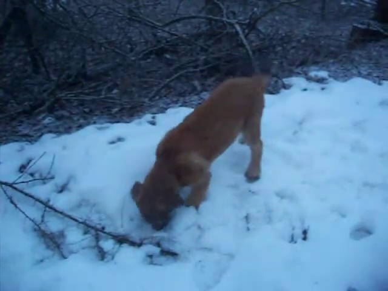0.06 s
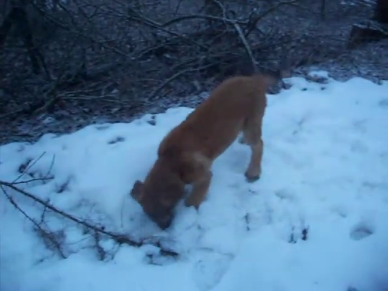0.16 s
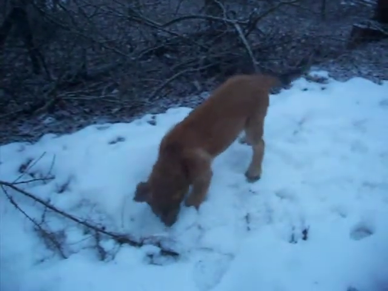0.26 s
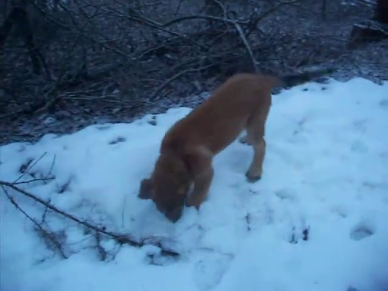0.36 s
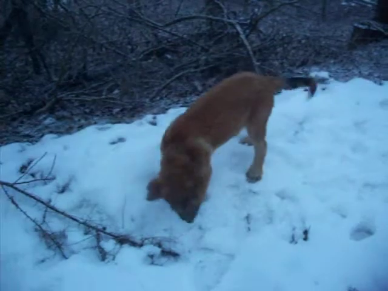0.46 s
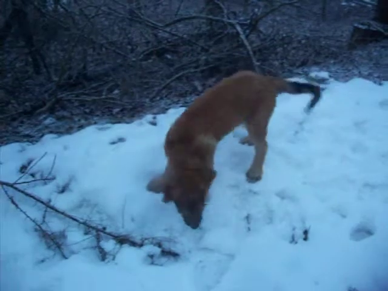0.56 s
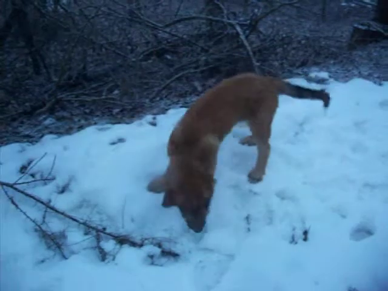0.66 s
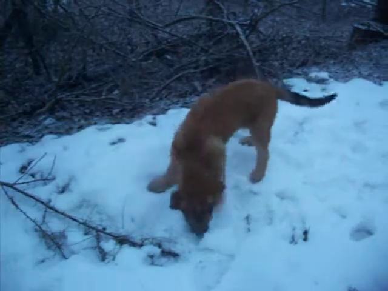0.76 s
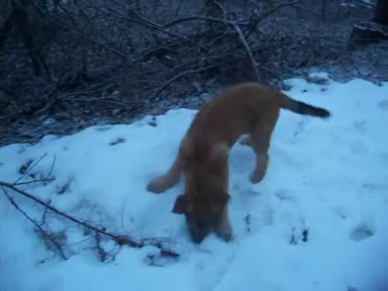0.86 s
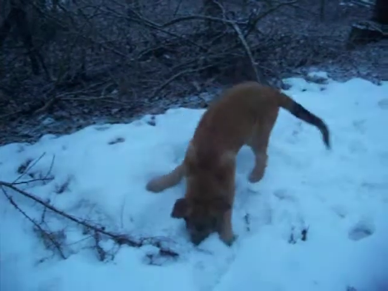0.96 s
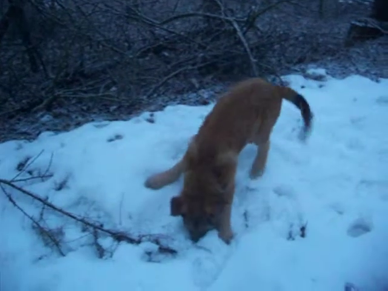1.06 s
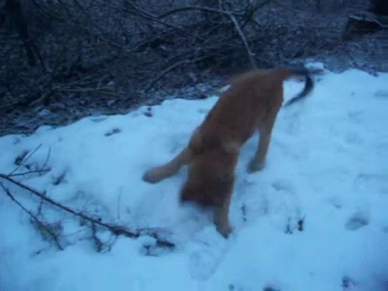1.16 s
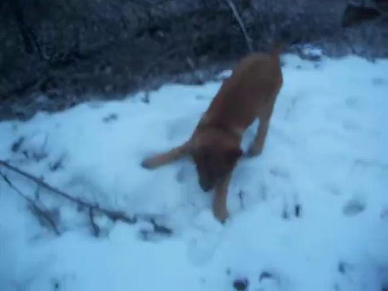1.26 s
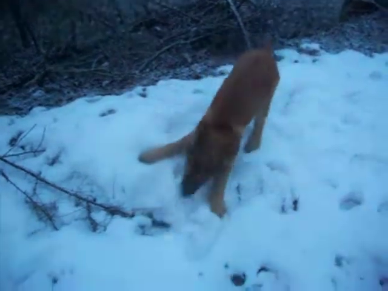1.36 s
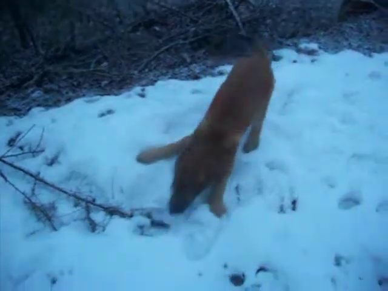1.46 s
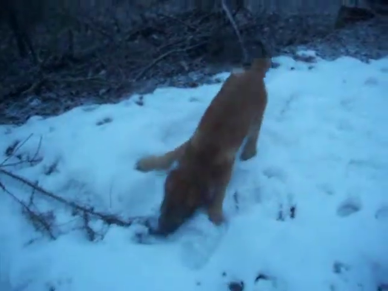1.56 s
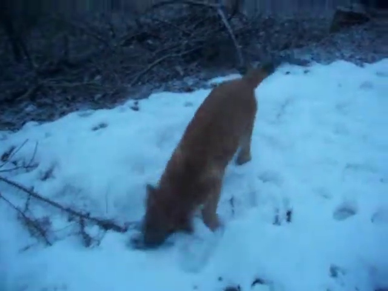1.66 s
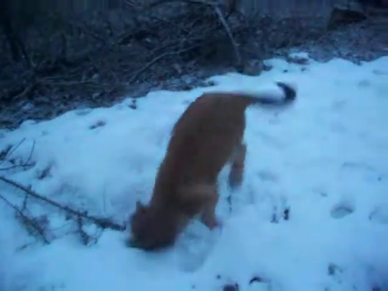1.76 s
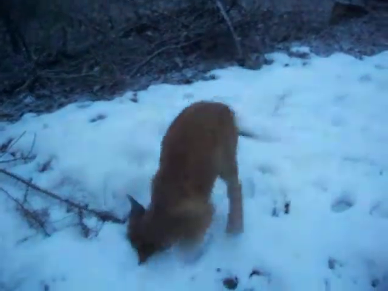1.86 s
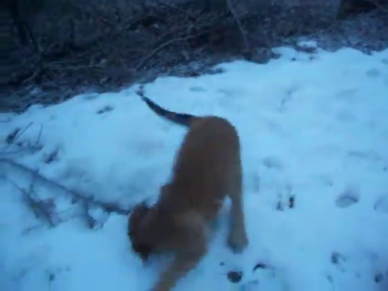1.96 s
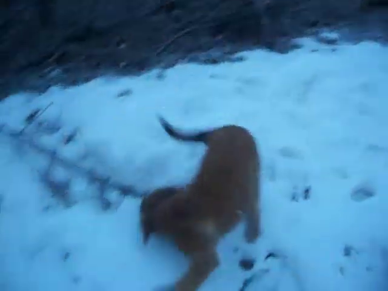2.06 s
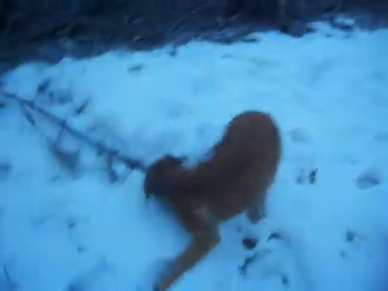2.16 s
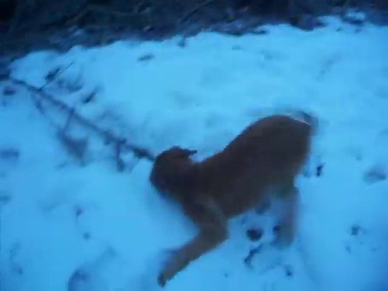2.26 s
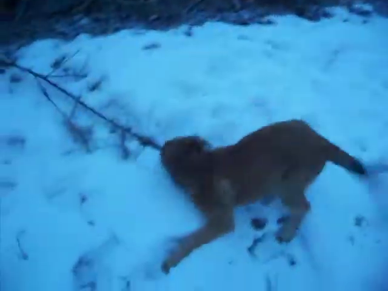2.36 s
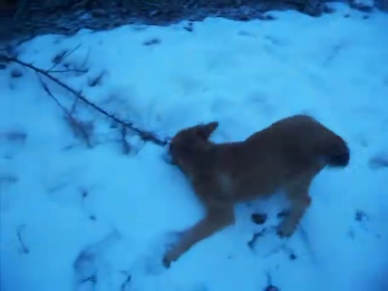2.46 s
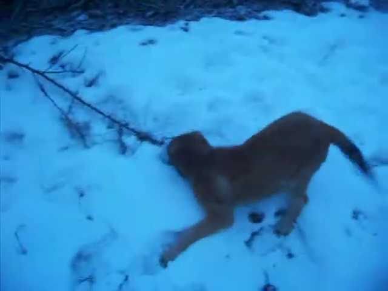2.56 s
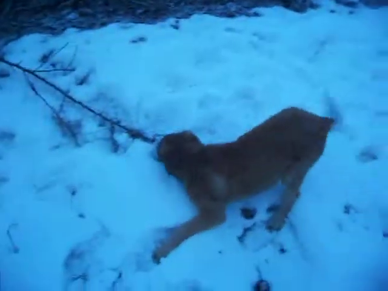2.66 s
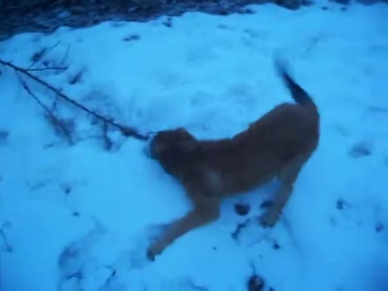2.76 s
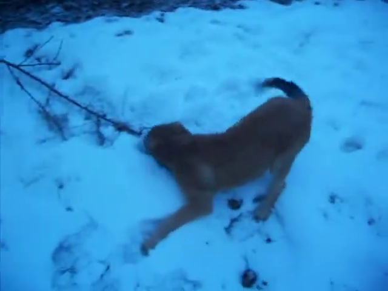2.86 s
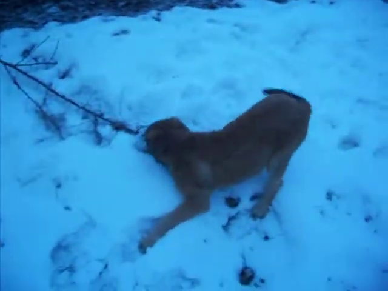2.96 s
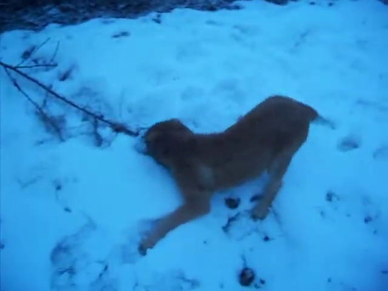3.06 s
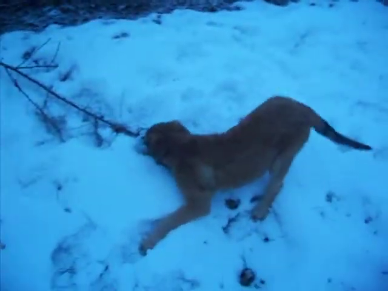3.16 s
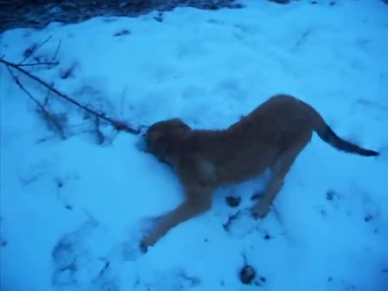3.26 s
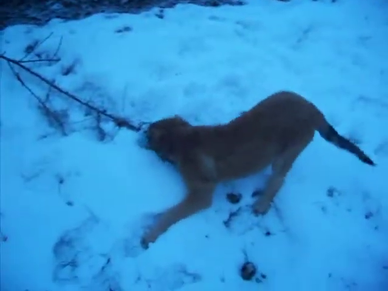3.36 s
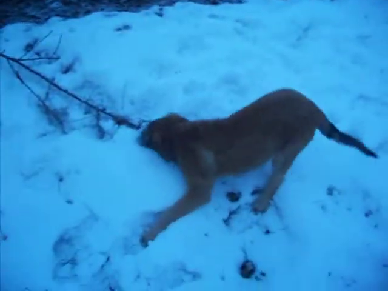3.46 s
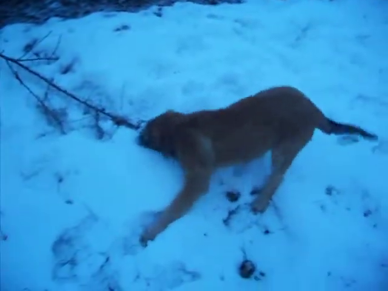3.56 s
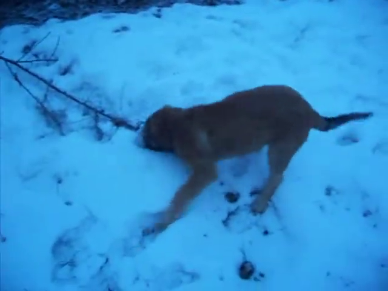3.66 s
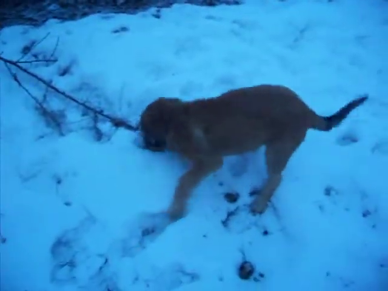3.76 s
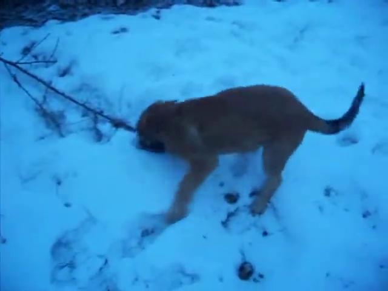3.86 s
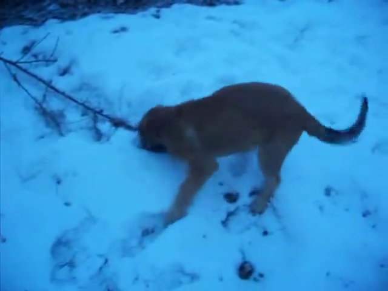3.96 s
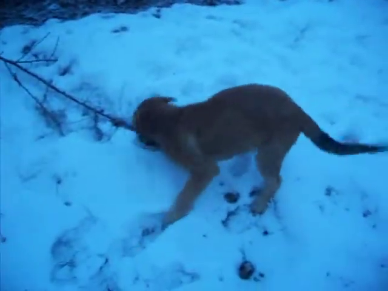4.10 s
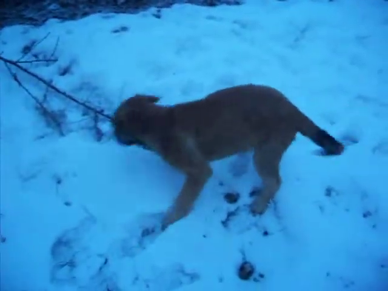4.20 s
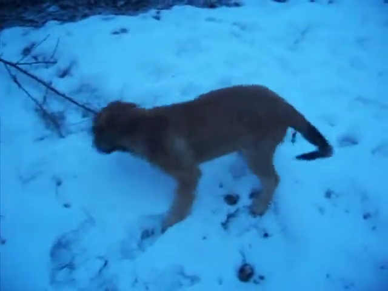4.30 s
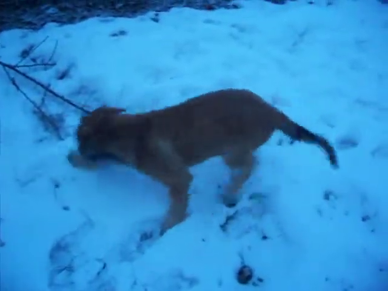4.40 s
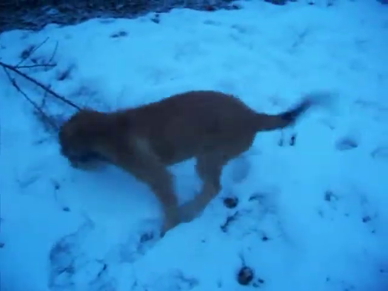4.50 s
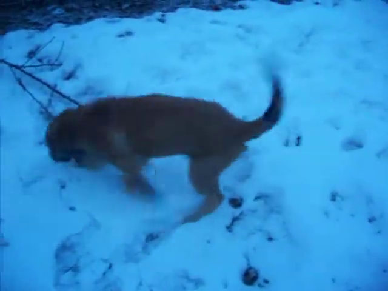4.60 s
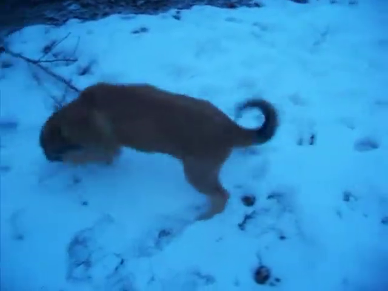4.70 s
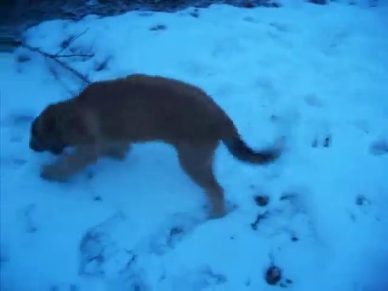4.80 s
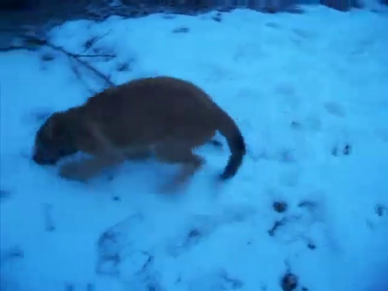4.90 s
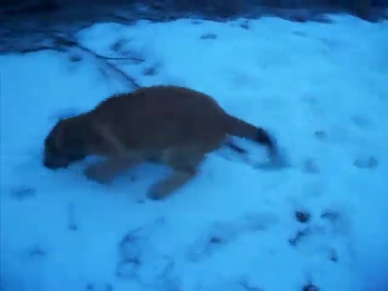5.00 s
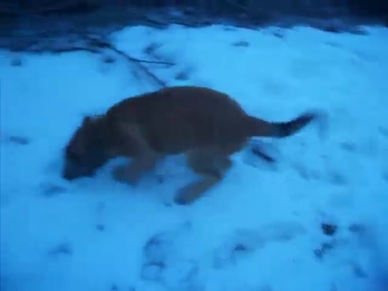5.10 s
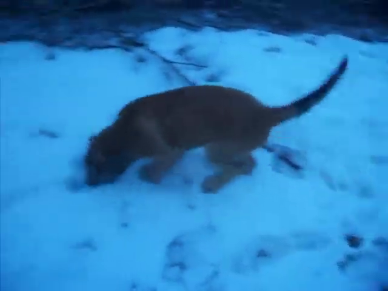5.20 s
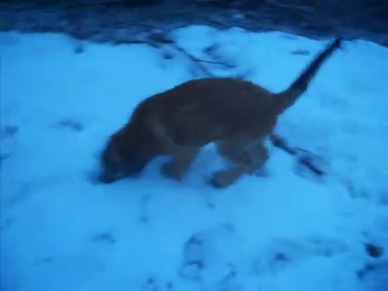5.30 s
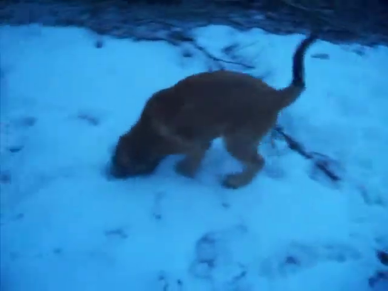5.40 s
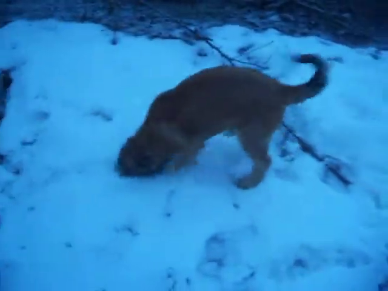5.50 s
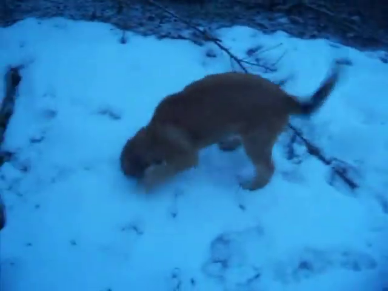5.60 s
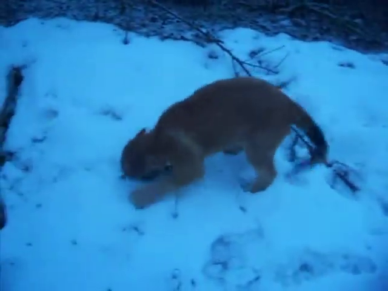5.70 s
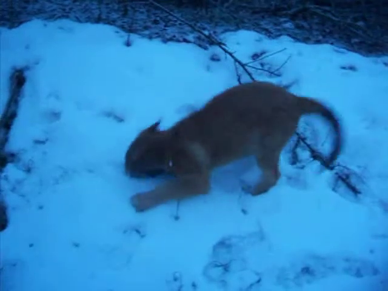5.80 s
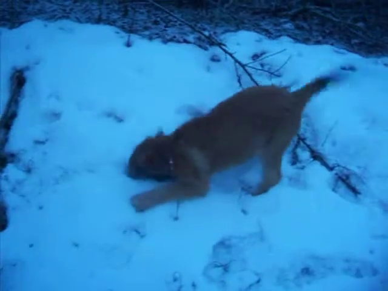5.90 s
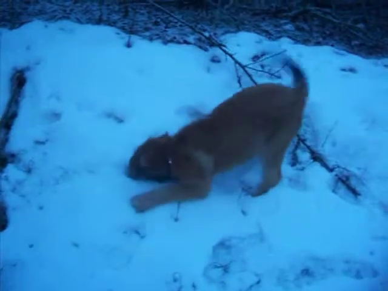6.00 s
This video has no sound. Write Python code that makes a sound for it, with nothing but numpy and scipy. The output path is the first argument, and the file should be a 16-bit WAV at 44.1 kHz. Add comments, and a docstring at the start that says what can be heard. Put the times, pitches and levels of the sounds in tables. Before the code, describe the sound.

Outdoors on crusty snow, a puppy roots close to a small camera. A steady, deep roar of far traffic with faint wavering engine hums lies underneath throughout, plus a barely audible thin whine. From 0 to 0.3 seconds a breathy snort fades away, with a soft low thump. A snap comes at 0.4, then from 0.5 to 1.0 strong grainy crunches burst out, made of tiny crackling crystals and hiss. Lighter scuffs continue to 1.7, then harder crunching returns around 1.9 to 2.4 with sharp snaps. From 2.5 to 3.5 it is nearly quiet, with only small ticks. Light scrapes resume at 3.6, a clear snap hits at 4.2, and from 4.4 crunching becomes dense and jerky. A short, gliding sniff comes at 5.1, more scuffs follow, and a dull paw thump lands at 5.85 before the crunching dies down. Mono, with softened highest treble.

```python
"""A puppy roots through crusty snow near a small camera, outdoors.
Nose and paws crush crystals in dense scuffs, made of thousands of tiny ringing clicks over soft hiss.
Short noise bursts make the snaps and the dull paw thumps; shaped noise makes one snort and one sniff.
Behind them, far traffic is a low noise roar with four wavering hums, two of them very faint.
The camera adds a faint steady whine."""
import sys
import numpy as np
from scipy import signal
from scipy.fft import rfft, irfft
from scipy.io import wavfile
from scipy.ndimage import uniform_filter1d

SR = 44100
rng = np.random.default_rng(int(sys.argv[2]) if len(sys.argv) > 2 else 0)


def file_out(sig):
    """Save sig as 16-bit WAV at sys.argv[1]."""
    # one column per channel
    cols = np.atleast_2d(sig).T
    # limit, then scale
    lim = np.clip(cols, -1, 1)
    pcm = np.round(lim * 32767).astype(np.int16)
    wavfile.write(sys.argv[1], SR, pcm)


N = 266668  # length in samples, about 6 seconds


def gain_of(db):
    """Turns decibels into amplitude."""
    return 10 ** (np.asarray(db) / 20)


def evened(x):
    """Scales a signal to an rms of 1."""
    return x / np.sqrt(np.mean(x ** 2) + 1e-20)


def read(points, hz):
    """Reads a spectrum table at the frequencies hz, along a logarithmic pitch scale."""
    f, value = np.transpose(points)
    return np.interp(np.log(hz + 1), np.log(f + 1), value)


def follow(rows, t):
    """Reads each column of a time curve at the times t."""
    s, *columns = np.transpose(rows)
    return [np.interp(t, s, c) for c in columns]


def add(mix, s, sound):
    """Mixes a sound in at s seconds."""
    part = mix[round(s * SR):][:len(sound)]
    part += sound[:len(part)]


def coloured(x, colour_db, size):
    """Reshapes the spectrum of x, one short moment after another, by colour_db(hz, t)."""
    overlap = size * 3 // 4
    hz, t, z = signal.stft(x, SR, nperseg=size, noverlap=overlap)
    z = z * gain_of(colour_db(hz[:, None], t))
    return signal.istft(z, SR, nperseg=size, noverlap=overlap)[1][:len(x)]


def patches(hz, t, size):
    """Random blobs over time and frequency, rms 1; size is (moments, frequency steps)."""
    field = rng.standard_normal((len(t), len(hz)))
    smooth_in_time = uniform_filter1d(field, size[0], 0)
    return evened(uniform_filter1d(smooth_in_time, size[1], 1)).T


# Nose and paws pushing through the crust.
# Each row: start in seconds, swell in seconds, hold in seconds, level at the top of the swell in dB,
# packed-snow body boost in dB, fine-powder fizz boost in dB (both boosts before the treble is levelled).
PUSHES = [(0.524, 0.028, 0.28, -45, -2, 0.0), (0.651, 0.034, 0.0032, -25.5, -2, 0.5),
          (0.694, 0.023, 0.01, -29, -0.5, -4), (0.728, 0.054, 0.029, -30, 2, -1.0),
          (0.808, 0.014, 0.24, -36.0, 2, -1), (0.872, 0.022, 0.044, -20.5, -1.5, -2),
          (0.914, 0.041, 0.1, -28.0, 2, 0), (0.951, 0.0034, 0.004, -20, -4.0, 3.0),
          (1.028, 0.16, 0.004, -43, 0.0, 0.0), (1.077, 0.016, 0.015, -42.0, -5, -1),
          (1.108, 0.022, 0.004, -40, -7.0, -2), (1.141, 0.018, 0.06, -36.5, 7, -0.5),
          (1.184, 0.077, 0.15, -40.5, 4, -4), (1.289, 0.034, 0.048, -36, 6.5, 2.5),
          (1.405, 0.009, 0.243, -51.0, 2, 0), (1.433, 0.149, 0.228, -47, 4, -3),
          (1.462, 0.012, 0.006, -37, -5, -4), (1.523, 0.003, 0.01, -37.5, 6, 0.0),
          (1.564, 0.029, 0.041, -35.5, 3, -2.5), (1.716, 0.041, 0.062, -31, 2.5, -2),
          (1.821, 0.01, 0.015, -34, 5, 3), (1.834, 0.048, 0.031, -30.0, 0, 0.5),
          (1.907, 0.11, 0.21, -34, 6, 1.5), (1.949, 0.13, 0.025, -22, 0.5, 2),
          (2.103, 0.0033, 0.037, -30.0, 3, -1.5), (2.178, 0.035, 0.24, -36, 2, -1.5),
          (2.285, 0.013, 0.051, -34, 3.0, -3), (2.313, 0.14, 0.21, -44.0, 7.5, 1),
          (2.317, 0.011, 0.069, -20, 1.5, 0.5), (2.366, 0.009, 0.043, -26.5, 5.5, 4.5),
          (2.492, 0.015, 0.025, -42.5, 0, -3), (2.599, 0.027, 0.023, -44.5, 7, 9),
          (2.667, 0.024, 0.038, -53.0, 5.0, 1.0), (2.7, 0.13, 0.019, -47.5, 7, 1),
          (2.9, 0.003, 0.041, -52.5, 9, 0), (2.942, 0.099, 0.25, -59.5, -7.0, -4.0),
          (3.092, 0.003, 0.018, -55, 5.0, 0), (3.228, 0.056, 0.061, -52.5, -5, -2),
          (3.39, 0.092, 0.09, -48.5, 7, 1), (3.52, 0.13, 0.17, -39.5, -1, 0),
          (3.58, 0.092, 0.243, -51, -2.0, 0), (3.651, 0.023, 0.007, -32, -7, -1),
          (3.683, 0.008, 0.043, -36, -8, 1.0), (3.7, 0.004, 0.066, -40, -8, 6),
          (3.792, 0.0028, 0.012, -41, 7, 1), (3.833, 0.099, 0.043, -44.5, 3, 4),
          (3.973, 0.071, 0.012, -34.5, 0, 5), (3.974, 0.013, 0.004, -37.5, -7.0, 8.0),
          (3.977, 0.13, 0.004, -42.5, 3.0, 3.0), (4.101, 0.13, 0.009, -35.5, 5, 1),
          (4.194, 0.073, 0.026, -38.5, 3.0, 7), (4.282, 0.063, 0.037, -43.0, 4.0, 3),
          (4.39, 0.043, 0.015, -29.0, 3.5, 0.5), (4.453, 0.079, 0.016, -33.0, -2, -5),
          (4.477, 0.11, 0.073, -29.5, 2.5, 2.5), (4.551, 0.005, 0.027, -24.5, -0.5, 5.5),
          (4.585, 0.0027, 0.026, -26.5, 1.5, -1), (4.627, 0.009, 0.013, -27.5, -3, -3.0),
          (4.66, 0.014, 0.008, -31.5, 1.5, 0), (4.675, 0.022, 0.019, -34, -7.0, -1),
          (4.718, 0.036, 0.034, -27.5, -4, -6), (4.804, 0.02, 0.03, -31.5, 2.5, -5.5),
          (4.854, 0.005, 0.068, -26.0, -2.5, -4.5), (4.92, 0.041, 0.052, -25, -1, -2),
          (5.022, 0.035, 0.054, -30, -3.5, -3.5), (5.103, 0.057, 0.0035, -33, 4, -6.5),
          (5.14, 0.05, 0.05, -41, -1, -8), (5.165, 0.125, 0.28, -38, 3.5, -1.0),
          (5.285, 0.031, 0.009, -24.0, -3.5, -1.0), (5.322, 0.024, 0.024, -26.0, -4, 1),
          (5.342, 0.004, 0.073, -27.0, -3.5, -2.0), (5.45, 0.11, 0.12, -29.5, 1.0, 2),
          (5.477, 0.034, 0.007, -23.5, -5, -4), (5.554, 0.15, 0.0054, -30.5, 3, -0.5),
          (5.605, 0.003, 0.094, -29, 0.0, 1), (5.704, 0.055, 0.004, -29.5, -1.5, 3),
          (5.759, 0.0072, 0.014, -26, -1, 0), (5.773, 0.092, 0.037, -29.0, -3.5, -3),
          (5.808, 0.16, 0.038, -45.5, 0, 2), (5.98, 0.003, 0.004, -42, -3, -3.0)]
SAG_DB, RELEASE_T60_S = -8.5, 0.049  # a scuff weakens while it holds, then stops


def scuffs():
    """Power of the crushing over time, and the body and fizz of whichever scuffs sound at the moment."""
    power, body, fizz = np.full(N, 1e-12), np.zeros(N), np.zeros(N)
    for s, swell, hold, top_db, body_db, fizz_db in PUSHES:
        u = np.arange(0, swell + hold + RELEASE_T60_S, 1 / SR)
        sag_db = SAG_DB * np.clip((u - swell) / hold, 0, 1)
        release_db = -60 * np.maximum(u - swell - hold, 0) / RELEASE_T60_S
        rise = np.minimum(u / swell, 1)
        push = (rise * gain_of(top_db + sag_db + release_db)) ** 2
        add(power, s, push)
        # stronger scuffs count for more in the shared body and fizz
        add(body, s, push * body_db)
        add(fizz, s, push * fizz_db)
    total = uniform_filter1d(power, size=256)
    return power, uniform_filter1d(body, size=256) / total, uniform_filter1d(fizz, size=256) / total


def crackle(per_s, spread_db, hiss):
    """Tiny fractures of unequal size, each ringing briefly in one of eight bands, over sliding powder."""
    top_hz = 9600
    happens = rng.random(N) < per_s / SR
    size = gain_of(spread_db * np.minimum(rng.exponential(1, N), 3.5)) * happens
    edges = np.linspace(0, top_hz, 9)
    band, fractures = rng.integers(0, 8, N), np.zeros(N)
    for k in range(8):
        ring = signal.firwin(65, [edges[k] + 1, edges[k + 1]], pass_zero=False, fs=SR)
        clicks = size * (band == k) * rng.choice([-1., 1.], N)
        fractures += signal.oaconvolve(clicks, ring, "same")
    powder = signal.oaconvolve(rng.standard_normal(N), signal.firwin(65, top_hz, fs=SR), "same")
    flat = np.sqrt(top_hz / (SR / 2))
    return flat * evened(evened(fractures) + hiss * evened(powder))


# Colour of the crushing with the muzzle facing the camera, before the treble is levelled.
# Each row: frequency in Hz, weight in dB per Hz.
CRYSTALS_FACING = [(180, -40), (300, -9), (336, -27), (501, -11.5), (1010, -8.5), (1280, -17),
                   (1440, -13.5), (1800, -5.5), (1990, -2), (3190, -13.5), (3950, -5), (5710, -2.5),
                   (6310, 0), (7810, -12), (9010, -36), (11700, -64), (19800, -120)]
# Colour of the crushing with the muzzle turned away; the snaps use it too.
# Each row: frequency in Hz, weight in dB per Hz.
CRYSTALS_TURNED = [(180, -32), (300, -4), (441, -23), (629, -3.5), (813, -12), (1020, -1.5), (1700, -4.5),
                   (2170, -7), (2840, -14), (4180, -0.5), (6490, -2.5), (7700, -1), (9010, -27),
                   (11700, -59.5), (19800, -120)]
# The turn of the head. Each row: time in seconds, share turned away from 0 to 1.
HEAD_TURN = [(0.5, 0.26), (1.3, 0.42), (1.7, 0.37), (2.1, 0.65), (2.4, 0.9), (3.0, 0.9), (3.7, 0.2),
             (4.2, 0.6), (4.6, 0.64), (5.0, 1), (5.4, 1), (6.0, 0.75)]
HOLLOW_HZ, HOLLOW_WIDTH_HZ, HOLLOW_DB = 5480, 940, -2.5


def snow():
    """Scuff pressure sets the crackle's level; packed snow adds body, and the head's turn sets the colour."""
    t = np.arange(N) / SR
    power, body, fizz = scuffs()
    stutter = evened(uniform_filter1d(rng.standard_normal(N), size=250))  # the crust yields in jerks

    def colour_db(hz, s):
        away = follow(HEAD_TURN, s)[0]
        low = 1 / (1 + (hz / 2700) ** 8)
        high = 1 / (1 + (5600 / (hz + 1)) ** 8)
        db = (1 - away) * read(CRYSTALS_FACING, hz) + away * read(CRYSTALS_TURNED, hz)
        db = db + low * np.interp(s, t, body) + high * np.interp(s, t, fizz)
        # the echo off the snow hollows this band
        db = db + away * HOLLOW_DB * np.exp(-((hz - HOLLOW_HZ) / HOLLOW_WIDTH_HZ) ** 2)
        db = db + 1.55 * patches(hz, s, size=(14, 4))
        # level the treble, so that the scuffs alone set its strength
        treble = np.mean(gain_of(2 * db) * (1 - low), 0)
        return db - 10 * np.log10(treble)

    grains = coloured(crackle(per_s=12000, spread_db=2.7, hiss=0.66), colour_db, size=256)
    return grains * np.sqrt(power) * gain_of(1.68 * stutter)


# Single crystals or twigs snapping. Each row: start in seconds, starting level in dB before colouring.
SNAP_TIMES = [(0.39, -32.5), (0.544, -22.5), (0.884, -13.5), (1.157, -23), (1.745, -22), (2.002, -17),
              (2.066, -15), (2.197, -27), (2.5855, -40), (2.615, -27), (2.6662, -24.5), (2.702, -31),
              (3.0949, -41), (3.317, -24), (3.484, -42), (4.2093, -16), (4.518, -23), (5.006, -19),
              (5.12, -17.5), (5.1806, -33), (5.4115, -17), (5.828, -21)]


def snaps():
    """Each snap is a bright noise burst that fades by 60 dB in 27 milliseconds, cut off after 18."""
    out, u = np.zeros(N), np.arange(800) / SR
    bursts = rng.standard_normal((len(SNAP_TIMES), 800))
    for (s, start_db), burst in zip(SNAP_TIMES, bursts):
        add(out, s, gain_of(start_db - 60 * u / 0.027) * burst)
    return coloured(out, lambda hz, s: read(CRYSTALS_TURNED, hz) - 21.0 * (hz < 3200), size=128)


# Air blown through the nose. Each row: time in seconds, level in dB.
SNORT_LEVEL = [(0.0, -36), (0.044, -31.5), (0.154, -36.5), (0.258, -45), (0.278, -66), (0.29, -66)]
# Resonances of the nasal passage. Each row: frequency in Hz, weight in dB per Hz before levelling.
NOSE_COLOUR = [(1000, -44), (1700, -22), (1930, -2), (2140, 0.5), (3080, -22.5), (3590, -1.5), (4210, -2.5),
               (5230, -14), (5450, -10), (5850, 0), (6630, -16), (6960, -9), (7460, -4.5), (8520, -21.5),
               (9010, -43), (11700, -65), (19800, -120)]


def snort():
    """Turbulent air takes on the resonances of the nasal passage."""
    def colour_db(hz, s):
        return read(NOSE_COLOUR, hz) + 1.2 * patches(hz, s, size=(10, 3))

    air = coloured(rng.standard_normal(N), colour_db, size=512)
    t = np.arange(N) / SR
    return evened(air) * gain_of(follow(SNORT_LEVEL, t)[0]) * (t < SNORT_LEVEL[-1][0])


# A sniff with a gliding resonance. Each row: time in seconds, level in dB, resonance in Hz.
SNIFF_GLIDE = [(5.11, -60, 880), (5.122, -33, 888), (5.141, -49, 1095), (5.166, -38, 1231),
               (5.201, -34, 1043), (5.235, -38, 876), (5.26, -60, 800)]


def sniff():
    """Air noise in a narrow band around one resonance that rises and falls."""
    t = np.arange(SNIFF_GLIDE[0][0], SNIFF_GLIDE[-1][0], 1 / SR)
    db, hz = follow(SNIFF_GLIDE, t)
    # slow noise, shifted up to the gliding pitch
    slow = signal.lfilter(*signal.butter(2, 140., fs=SR), rng.standard_normal((2, len(t))))
    carrier = np.exp(2j * np.pi * np.cumsum(hz) / SR)
    air = ((slow[0] + 1j * slow[1]) * carrier).real
    out = np.zeros(N)
    add(out, t[0], gain_of(db) * evened(air))
    return out


# Paws landing. Each row: start in seconds, level in dB before the fade-in and decay,
# pitch in Hz, time to fade by 60 dB in seconds.
PAWS = [(.095, -33.5, 455, .2), (0.099, -32, 895, .25), (0.542, -35, 250, 0.1), (0.663, -27.5, 300, .088),
        (1.152, -31, 264, 0.079), (2.339, -34.5, 343, .11), (5.444, -33, 252, .11),
        (5.849, -22, 308, 0.078), (5.855, -30.5, 145, 0.15), (5.872, -30, 300, 0.066)]


def thumps():
    """A soft paw compresses the snow: a short dull burst around one pitch."""
    out, u = np.zeros(N), np.arange(6000) / SR
    fade_in = np.minimum(u / 0.012, 1)
    for (s, level_db, hz, t60), burst in zip(PAWS, rng.standard_normal((len(PAWS), 6000))):
        dull = signal.lfilter(*signal.butter(1, [hz * 0.7, hz * 1.24], "band", fs=SR), burst)
        add(out, s, gain_of(level_db - 60 * u / t60) * fade_in * evened(dull))
    return out


# Colour of the far traffic. Each row: frequency in Hz, weight in dB per Hz before ROAR_DB is added.
ROAR_COLOUR = [(12, -43.5), (24, -13.5), (36, -4), (62, -6.5), (108, -14), (200, -18), (420, -21.5),
               (700, -20), (1000, -17), (1650, -16), (2050, -21.5), (2350, -29), (2800, -38), (4400, -40),
               (7300, -41), (8300, -48.5), (9100, -84)]
# Lean of the tyre hiss. Each row: time in seconds, strength of the shift towards the bass in dB
# (before the band shape around 1350 Hz scales it).
HISS_LEAN = [(0.0, 0.5), (1.5, 2.5), (2.3, 0), (3.7, -2), (4.7, -3), (5.6, 6), (6.05, 5.5)]
ROAR_DB = -10.5


def traffic():
    """A smooth distant roar with slow patches; its hiss leans lower or higher as vehicles pass."""
    def colour_db(hz, s):
        pitch = np.log((hz + 1) / 1350)
        # raises below 1350 Hz and lowers above it, only nearby
        lean = np.clip(-pitch / 0.29, -1, 1) * np.exp(-(pitch / 0.4) ** 2)
        blobs = 1.1 * patches(hz, s, size=(12, 14))
        return read(ROAR_COLOUR, hz) + follow(HISS_LEAN, s)[0] * lean + blobs

    return gain_of(ROAR_DB) * coloured(rng.standard_normal(N), colour_db, size=2048)


# Low engine tones. Each row: pitch in Hz, wander in Hz (twice the rms drift),
# peak level in dB before the swell and the shared level curve.
ENGINES = [(46.05, 3.96, -40), (86.5, 2.13, -48.5), (145, 3, -59.5), (340.5, 4.01, -59.5)]
# Shared level of the tones. Each row: time in seconds, change in dB.
ENGINE_LEVEL = [(0, 0), (.5, -2.5), (1.2, 1.5), (2.2, 0.5), (3.3, 3), (4.5, -3), (6.05, -6.5)]


def slow_wander():
    """Noise smoothed twice into a slow random curve, rms 1."""
    once = uniform_filter1d(rng.standard_normal(N), size=4000)
    return evened(uniform_filter1d(once, size=4000))


def hums():
    """Low engine tones whose pitch wanders, so each is a narrow band of nearly even level."""
    t, out = np.arange(N) / SR, np.zeros(N)
    for hz, width_hz, db in ENGINES:
        drift, swell = slow_wander(), slow_wander()
        phase = 2 * np.pi * np.cumsum(hz + width_hz / 2 * drift) / SR
        out += gain_of(db + 2.0 * swell) * np.sin(phase)
    return out * gain_of(follow(ENGINE_LEVEL, t)[0])


def scene():
    """All sources in one channel."""
    return (snow() + snaps() + snort() + sniff() + thumps() + traffic() + hums())[None]


# The camera's own whine. Each row: pitch in Hz, rms level in dB.
CAMERA_WHINE = [(4290, -65)]
# Treble roll-off of the microphone. Each row: frequency in Hz, change in dB.
MICROPHONE = [(7000, 0), (8000, -5), (8600, -1), (9100, -15.5)]
EDGE_HZ = 9170  # cut-off of the final band limit


def record(dry):
    """The camera's whine, soft saturation of the input stage, microphone roll-off, then the band limit."""
    t = np.arange(N) / SR
    whine = sum(np.sqrt(2) * gain_of(db) * np.sin(2 * np.pi * hz * t) for hz, db in CAMERA_WHINE)
    ceiling = gain_of(-3.0)
    soft = ceiling * np.tanh((dry + whine) / ceiling)
    roll_off = gain_of(read(MICROPHONE, np.fft.rfftfreq(N, 1 / SR)))
    dull = irfft(rfft(soft) * roll_off, N)
    band_limit = signal.firwin(511, EDGE_HZ, window=("kaiser", 9), fs=SR)
    return signal.oaconvolve(dull, band_limit[None], "same")


dry = scene()
out = record(dry)
file_out(out)
```